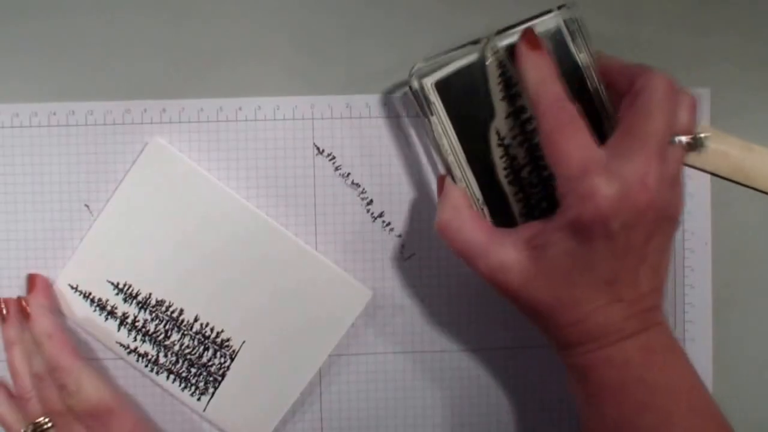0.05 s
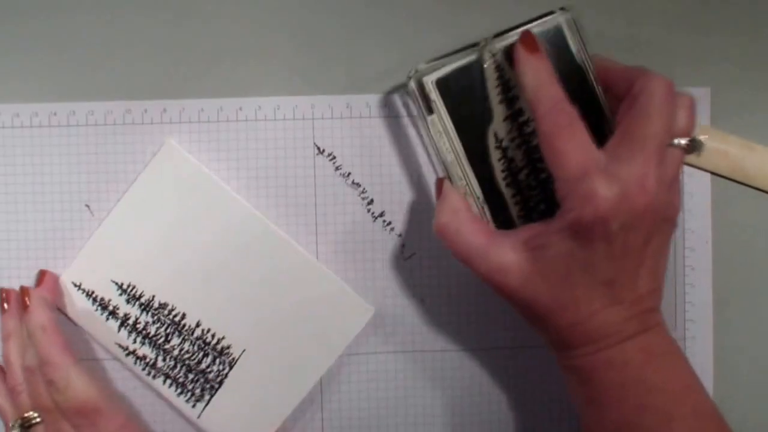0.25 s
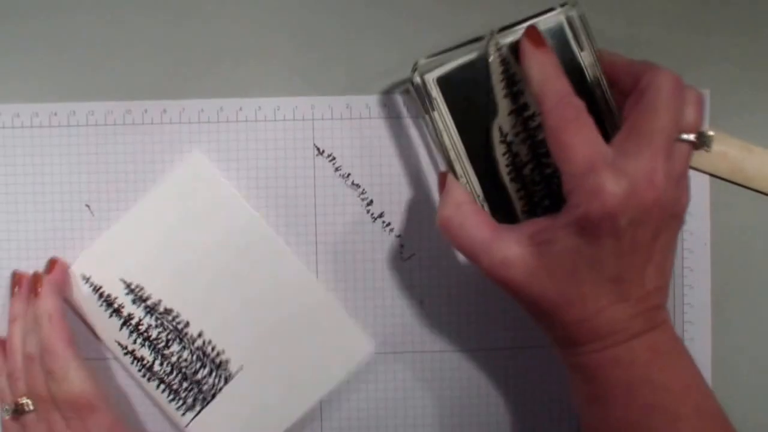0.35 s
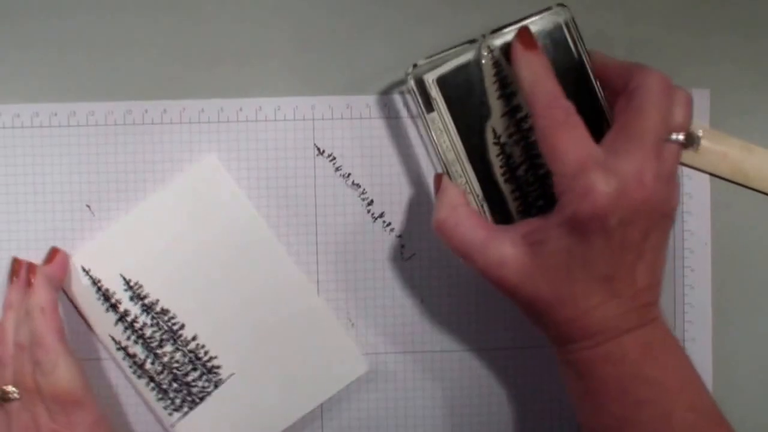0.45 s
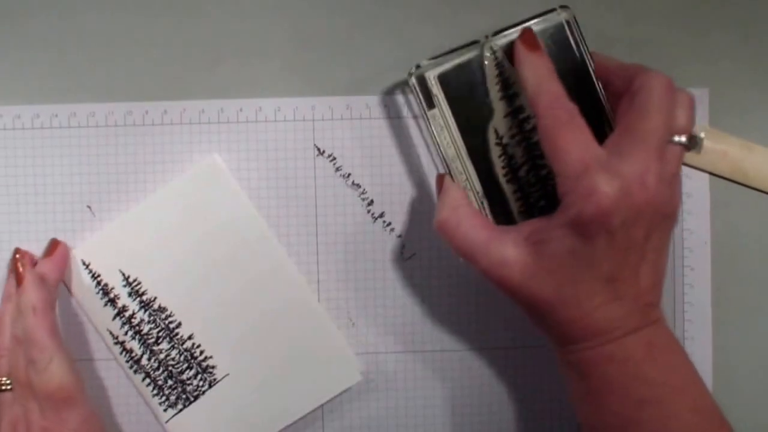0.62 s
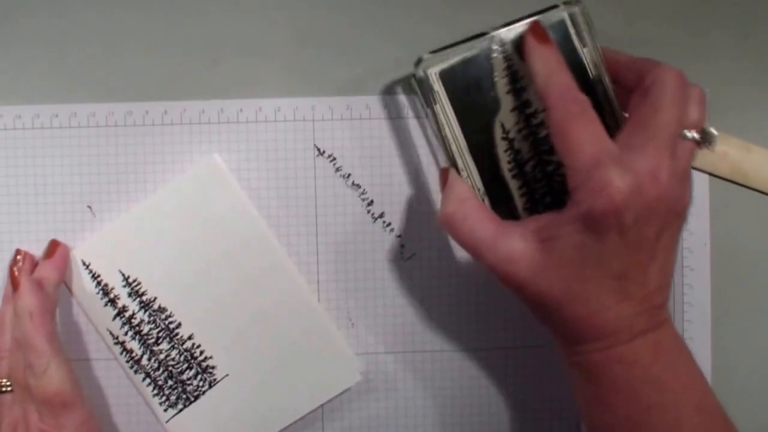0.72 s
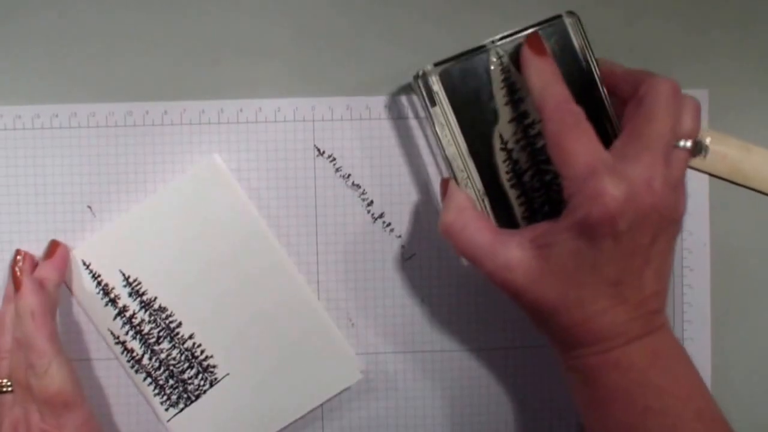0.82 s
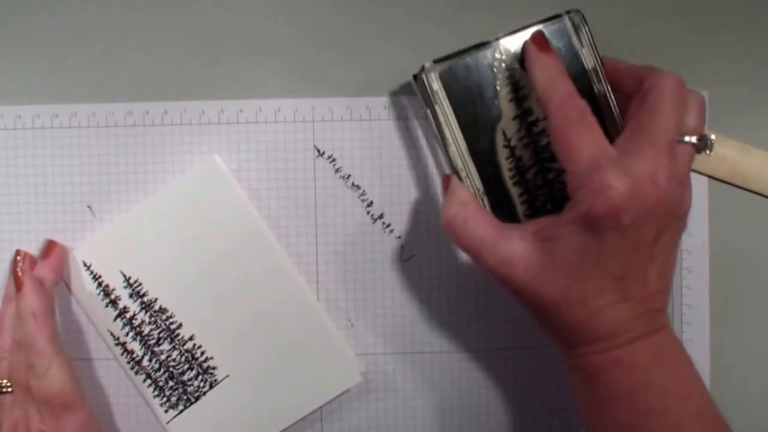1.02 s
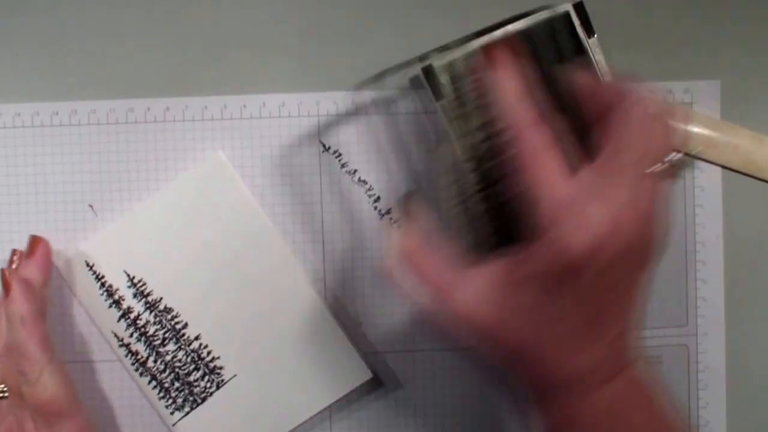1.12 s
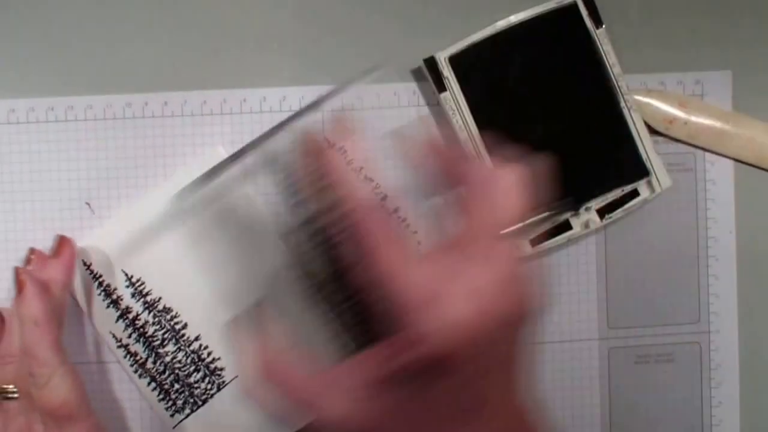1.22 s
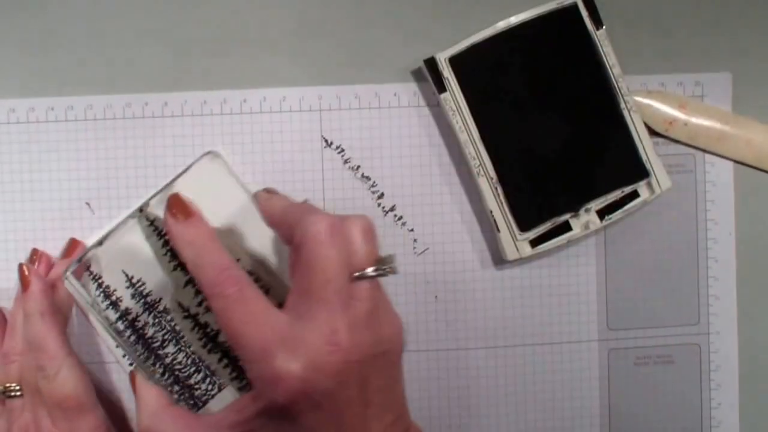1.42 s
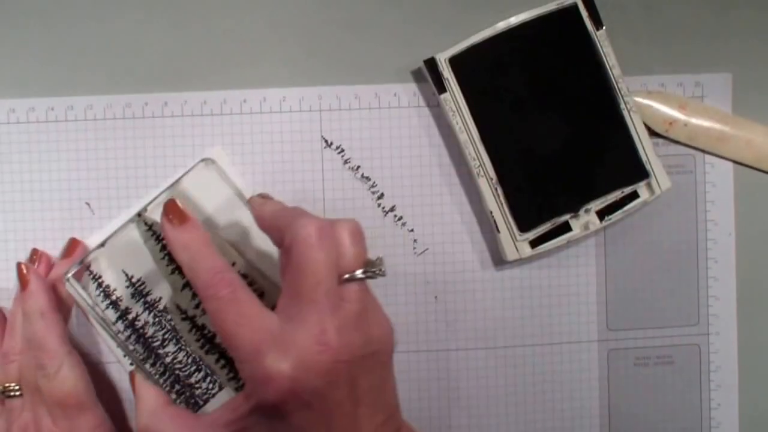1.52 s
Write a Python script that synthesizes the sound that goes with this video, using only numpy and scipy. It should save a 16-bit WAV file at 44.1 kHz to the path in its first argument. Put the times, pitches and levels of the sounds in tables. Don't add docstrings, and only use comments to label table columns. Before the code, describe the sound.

A stamp block is slapped onto a plastic-cased ink pad at about 0.2, 0.4, 0.6, 0.75, 0.95 and 1.1 seconds. Each slap is a tight cluster of hard, dry clacks; the table booms low and loose things rattle. The third and fourth are softer underneath. Faint sticky ticks and hand rustle fall between, then the rumble fades after 1.2 seconds into soft room hiss, close microphone.

```python
import sys
import numpy as np
from scipy import signal
from scipy.fft import rfft, irfft
from scipy.io import wavfile

SR = 44100
rng = np.random.default_rng(int(sys.argv[2]) if len(sys.argv) > 2 else 0)


def put_to_file(sound):
    columns = np.atleast_2d(sound).T
    safe = np.clip(columns, -1, 1)
    whole_steps = np.round(safe * 32767)
    wavfile.write(sys.argv[1], SR, whole_steps.astype(np.int16))


def field_ratio(decibels):
    return 10 ** (np.asarray(decibels, dtype=float) / 20)


N = 68355


def evened(x):
    return x / np.sqrt(np.mean(x ** 2) + 1e-20)


def read(points, hz):
    f, value = np.transpose(points)
    return np.interp(np.log(hz + 1), np.log(f + 1), value)


def add(mix, start_s, sound):
    at = round(start_s * SR)
    sound = sound[max(-at, 0):]
    part = mix[max(at, 0):][:len(sound)]
    part += sound[:len(part)]


def colour(x, points):
    gain = field_ratio(read(points, np.fft.rfftfreq(x.shape[-1], 1 / SR)))
    return irfft(rfft(x) * gain, x.shape[-1])


def band(x, hz, width_hz):
    return signal.lfilter(*signal.iirpeak(hz, hz / width_hz, SR), x)


def modes(table, length_s, turns, factor=0.98, extra_db=0.):
    hz, db, t60_s = np.transpose(table)[:, :, None]
    t = np.arange(round(length_s * SR)) / SR
    sines = np.sin(2 * np.pi * (hz * factor * t + turns))
    return (field_ratio(db + extra_db - 60 * t / t60_s) * sines).sum(0)


# t/s, case pitch factor, table sway/dB, table thump/dB, rattle/dB
SLAPS = [
    (-.04, 1.01, -34, -43.5, -47),
    (0.217, 0.99, -27, -30, -39),
    (0.4115, 1.006, -27, -30, -37.5),
    (0.5951, 1.025, -33, -36.5, -41),
    (0.7606, 1.004, -33, -40, -41.5),
    (0.9548, 0.97, -28, -26, -38),
    (1.1075, 1, -28.5, -26.5, -38.5),
]
CONTACT_S = [.2178, .2189, .2221, .2252, .4133, .4144, .4175, .4196, .5947, .5964, .5980, .5996, .6033,
             .7604, .7622, .7636, .7643, .7665, .9547, .9558, .9582, .9600, .9652, 1.1085, 1.1095, 1.1116,
             1.1137, 1.1189]
# force/dB, crack/dB, crack centre f/Hz
CONTACTS = [(-3.5, -54, 3500), (-8.5, -1, 1510), (-4, -5.5, 3120), (-46, -19, 2700), (-17, -15, 1600),
            (-1, -3.5, 1860), (-25, -9.5, 3200), (-19.5, -10, 2900), (-22.5, -19.5, 950), (-5, -7.5, 3000),
            (-14.5, -0.5, 850), (-42, -11, 1300), (-19, -41, 5500), (-21, -17, 2100), (-14.5, -12.5, 920),
            (-16, -2, 2100), (-3, -1, 2100), (-13.5, -5, 1930), (-10, -13, 4700), (-4.5, -17.5, 2900),
            (-39, -1.5, 1920), (-4, -17, 2000), (-17, -21, 680), (-46, -19.5, 740), (-3, -9.5, 890),
            (-8.5, -7.5, 1800), (-7.5, -8, 1270), (-15.5, -27, 880)]
# f/Hz, level/dB, t60/s
CASE = [(500, -6.5, 0.04), (737, -6.5, 0.017), (977, 2, 0.016), (1189, 3.5, 0.014), (1521, -3.5, 0.026),
        (1685, 0.5, 0.017), (2265, -5.5, 0.021), (2509, -4.5, 0.017), (3280, -1, 0.013), (3685, -4, 0.019),
        (4910, -1.5, 0.0093), (5400, -25.5, 0.03), (7820, -11, 0.012)]
LANDING_LOW = [(-1, 3, -3, -0.5, -19), (-2, -20, 5.5, 0, -24), (1.5, -15, 4, 0.5, 8.5), (-4, 0, -11, 5, -3),
               (-9, 5, 1.5, -10, 3), (-4.5, 5.5, 2.5, -2.5, -9)]
LANDING_HIGH = [(3, -20, -7, -5, 0), (5.5, 2, 4, -3, 1), (3, -4, 9, -3, 4), (3.5, 6, -15, 4, -20),
                (7, 5, -6, 3, -4.5), (-3, -17, 2.5, 0, -4)]


def slaps():
    crack_fall_s, touch_s = 0.0012, 0.00024
    crack_q, crack_top_hz, broad_db = 2.45, 11700, -8
    spot_db = 2.5
    soft_dull = 0.14
    out, t = np.zeros(N), np.arange(400) / SR
    noise = rng.standard_normal((len(CONTACTS), len(t) + len(CASE)))
    top = signal.butter(2, crack_top_hz, fs=SR)
    octaves = np.log2(np.maximum(np.array(CASE)[:, :1] / 1000, 1))
    for s, (force_db, crack_db, hz), grit in zip(CONTACT_S, CONTACTS, noise):
        slap = sum(row[0] < s + .003 for row in SLAPS[1:]) - 1
        spot, grit = grit[:len(CASE), None], grit[len(CASE):]
        favour_db = np.zeros((len(CASE), 1))
        favour_db[:10, 0] = np.hstack([LANDING_LOW[slap], LANDING_HIGH[slap]])
        favour_db = favour_db + soft_dull * min(crack_db - force_db, 0) * octaves
        ring = modes(CASE, 0.046, 0, SLAPS[slap + 1][1], favour_db + spot_db * spot)
        onset = 1 - np.exp(-np.arange(len(ring)) / SR / touch_s)
        add(out, s, field_ratio(force_db - 6.5) * ring * onset)
        burst = grit * np.exp(-t / crack_fall_s)
        crack = band(burst, hz, hz / crack_q)
        broad = field_ratio(broad_db) * signal.lfilter(*top, burst)
        add(out, s, field_ratio(crack_db) * (crack / abs(crack).max() + broad))
    return signal.lfilter(*signal.butter(2, 150, "high", fs=SR), out)


# f/Hz, level/dB, t60/s
SWAY = [(44.84, -1, 0.91), (56.1, -4.5, 0.65), (65.95, -9.5, 1), (82.3, -6, 1), (103.04, -7, 0.85),
        (126.4, -3, 0.71)]
# f/Hz, level/dB, t60/s
THUMP = [(156.2, -5.5, 0.44), (172, -2.5, 0.27), (191.4, -12.5, 0.54), (215.2, -2, 0.24),
         (258.1, -12, 0.34)]
# f/Hz, width/Hz, level/dB, t60/s
RATTLE = [(324, 48, 2, 0.35), (507, 71, 10.5, 0.14), (560, 140, -2, 1), (684, 34, -13.5, 1),
          (815, 117, -6, 1), (970, 83, 0, 0.34), (1120, 200, 3.5, 0.11), (1780, 250, -25, 0.45)]
# f/Hz, level over the rattle/dB, t60/s
CLING = [(356.8, 2.5, 0.57)]


def table():
    length_s, sway_rise_s, thump_rise_s, rattle_rise_s = .6, 0.036, 0.011, 0.0015
    push = [(63, 4.5, 0.046)]
    out, t = np.zeros(N), np.arange(round(length_s * SR)) / SR
    fade = np.minimum((t[-1] - t) / .2, 1)
    turns = rng.random((len(SWAY) + len(THUMP), 1))
    noise = rng.standard_normal((len(SLAPS), len(t)))
    for (s, _, sway_db, thump_db, rattle_db), grit in zip(SLAPS, noise):
        sway = modes(SWAY, length_s, turns[:len(SWAY)]) * (1 - np.exp(-t / sway_rise_s))
        sway = sway + modes(push, length_s, 0)
        thump = modes(THUMP, length_s, turns[len(SWAY):]) * (1 - np.exp(-t / thump_rise_s)) ** 2
        rattle = modes(CLING, length_s, 0)
        for hz, width_hz, db, t60_s in RATTLE:
            rattle = rattle + field_ratio(db - 60 * t / t60_s) * evened(band(grit, hz, width_hz))
        rattle = rattle * (1 - np.exp(-t / rattle_rise_s))
        shake = field_ratio(sway_db) * sway + field_ratio(thump_db) * 2 * thump + field_ratio(rattle_db - 3) * rattle
        add(out, s, fade * shake)
    return out


# t/s, level/dB, f/Hz, width/Hz
TICKS = [(.0045, -33.5, 3570, 1470), (0.1446, -37, 1400, 3000), (0.3344, -33.5, 8550, 5000),
         (0.3527, -34, 5300, 3500), (0.3694, -34, 3650, 700), (0.3862, -30, 3650, 600),
         (0.3986, -26, 3620, 600), (0.729, -39, 4000, 3000), (0.8348, -57, 5760, 5000),
         (.998, -35, 6840, 4001), (1.022, -51, 7050, 5000), (1.152, -34.5, 5640, 4060),
         (1.175, -38.5, 6360, 5000)]


def ticks():
    fall_s, edge_fall_s, edge_db = 0.0011, 0.0012, -10
    out, t = np.zeros(N), np.arange(500) / SR
    noise = rng.standard_normal((len(TICKS), len(t)))
    for (s, db, hz, width_hz), grit in zip(TICKS, noise):
        ring = np.exp(-np.pi * width_hz * t) * np.cos(2 * np.pi * hz * t)
        click = grit * np.exp(-t / fall_s)
        for _ in range(2):
            click = np.convolve(click, ring)[:len(t)]
        edge = field_ratio(edge_db) * grit * np.exp(-t / edge_fall_s)
        add(out, s, field_ratio(db) * (click / abs(click).max() + edge))
    return out


# t/s, rustle level/dB, share of paper rub/dB
MOVE = [(0, -52.5, -18), (.04, -52.5, -33), (0.123, -59, -27.5), (.155, -48.5, -37), (.205, -47, -36),
        (.28, -58.5, -12), (.39, -44.5, -6.5), (.47, -58, -0.5), (.55, -39.5, -5), (.6, -49.5, 5.5),
        (0.669, -71.5, 10), (0.742, -45.5, 2), (.83, -69.5, 14), (0.919, -50.5, 6.5), (.96, -63.5, 10),
        (1.17, -67, -29), (1.22, -50, -41), (1.268, -57, 6)]
# f/Hz, level/dB per Hz
RUSTLE = [(200, -33), (500, -4), (1200, -8), (2500, -3), (5000, -2), (9000, -4.5), (13000, -12.5),
          (16000, -11)]


def rustle():
    grain_db, grains_per_s = 1.2, 9000
    rub_hz, rub_width_hz = 1970, 1550
    s, level_db, rub_db = np.transpose(MOVE)
    t = np.arange(N) / SR
    size = field_ratio(grain_db * np.minimum(rng.exponential(1, N), 5))
    hit = rng.random(N) < grains_per_s / SR
    grains = rng.standard_normal((3, N)) * (.5 + size * hit)
    fizz = evened(colour(grains[0] + 0.86 * grains[1:], RUSTLE))
    rub = evened(band(band(grains[0], rub_hz, rub_width_hz), rub_hz, rub_width_hz))
    level = field_ratio(np.interp(t, s, level_db, right=-90))
    return level * (fizz + field_ratio(np.interp(t, s, rub_db)) * rub)


# f/Hz, t60/s (held to at least 0.05 s)
ROOM_T60 = [(300, 6.5), (1100, 0.03), (2900, 1.3), (7700, -0.9), (15000, -2.37)]
# f/Hz, level/dB
ROOM_TONE = [(200, 8.5), (700, 3.1), (2000, -6.5), (5000, -3), (14000, -26)]


def room(x):
    gap_s, level_db, side_share = .002, -18.5, 0.35
    early_t60_s, early_db, early_tilt = 0.077, 19, 0.14
    taps = np.zeros((2, SR // 2))
    slots = np.arange(0, SR // 2 - 20, 20)
    at = slots + rng.integers(0, 20, (2, len(slots)))
    np.put_along_axis(taps, at, rng.choice([-1., 1.], at.shape), 1)
    hz, t, z = signal.stft(taps, SR, nperseg=128)
    late = field_ratio(-60 * t / np.maximum(read(ROOM_T60, hz), .05)[:, None])
    haste = np.maximum(hz[:, None] / 1000, 1) ** early_tilt
    early = field_ratio(early_db - 60 * t / early_t60_s * haste)
    z = z * (late + early) * field_ratio(read(ROOM_TONE, hz)[:, None])
    mid, side = signal.istft(z, SR, nperseg=128)[1]
    tail = np.array([mid + side_share * side, mid - side_share * side])
    tail = tail / np.linalg.norm(mid) * np.linspace(1, 0, len(mid)) ** 2
    tail = np.pad(tail, ((0, 0), (round(gap_s * SR), 0)))
    return field_ratio(level_db) * signal.fftconvolve(x[None], tail, axes=1)[:, :N]


# f/Hz, level/dB per Hz
HUSH = [(20, -25), (45, -3), (110, -6), (250, -18), (900, -22), (4400, -26), (11000, -31), (16000, -39)]
# f/Hz, correlation
SAME = [(60, 1), (240, 0.49), (950, 0.68), (3770, 1), (15000, 0.32)]


def hush():
    a, b = rfft(rng.standard_normal((2, N)))
    same = np.clip(read(SAME, np.fft.rfftfreq(N, 1 / SR)), -1, 1)
    pair = irfft([a, same * a + np.sqrt(1 - same ** 2) * b], N)
    return field_ratio(-50.5) * evened(colour(pair, HUSH))


# f/Hz, left over right level/dB
LEAN = [(60, 6), (240, 2), (950, 0.5), (3770, 0.5), (15000, 1)]


def scene():
    port_delay_s = .000011
    hits = slaps()
    near = rfft(hits + table() + ticks(), 2 * N)
    hz = np.fft.rfftfreq(2 * N, 1 / SR)
    lean = field_ratio(read(LEAN, hz) / 2) * np.exp(-1j * np.pi * hz * port_delay_s)
    direct = irfft([near * lean, near / lean])[:, :N]
    return direct + room(hits) + rustle() + hush()


def low_pass(x):
    return signal.sosfilt(signal.butter(12, 16650, fs=SR, output="sos"), x)


def record(dry):
    bass_cut_hz, limit, edge_hz = 25, .92, 16200
    cut = signal.sosfilt(signal.butter(2, bass_cut_hz, "high", fs=SR, output="sos"), dry)
    soft = limit * np.tanh(cut / limit)
    edge = signal.firwin(101, edge_hz, fs=SR)[None]
    mix = signal.oaconvolve(soft, edge, "same")
    return low_pass(mix)


dry = scene()
out = record(dry)
put_to_file(out)
```